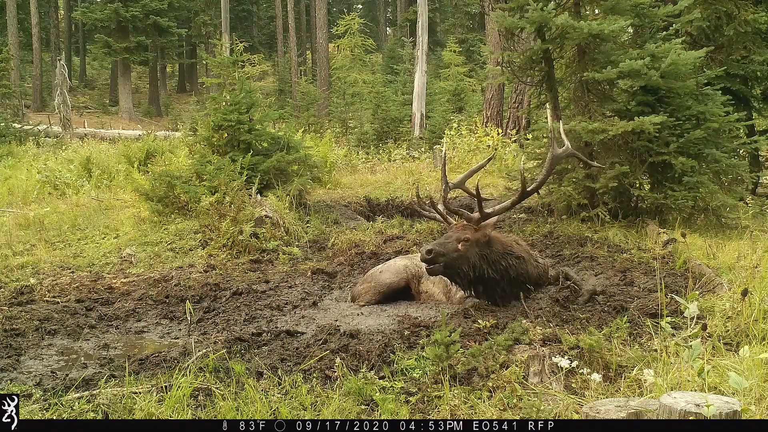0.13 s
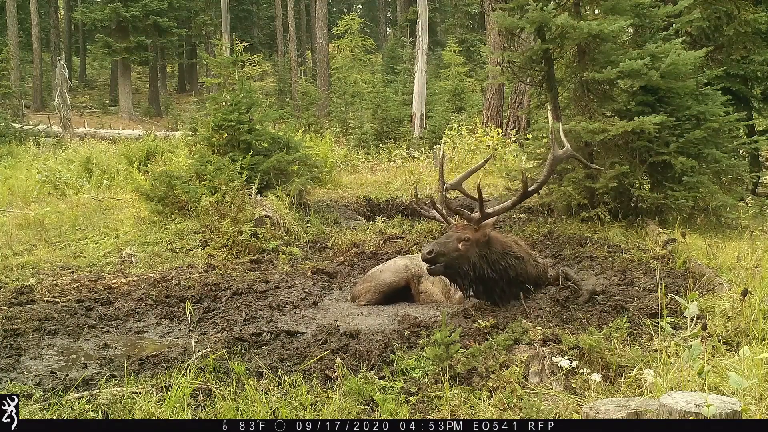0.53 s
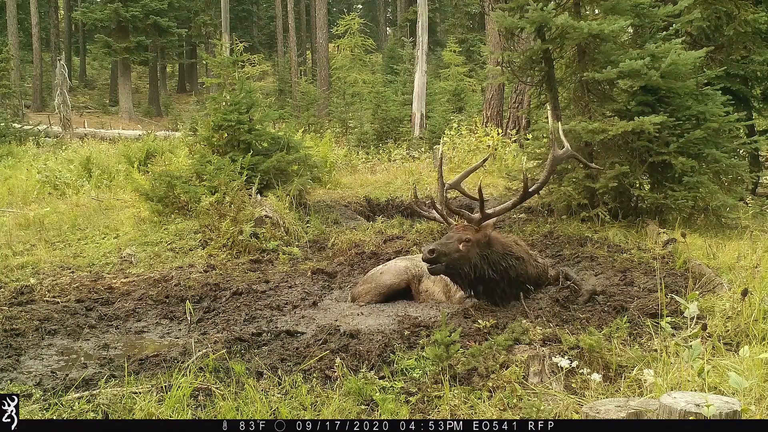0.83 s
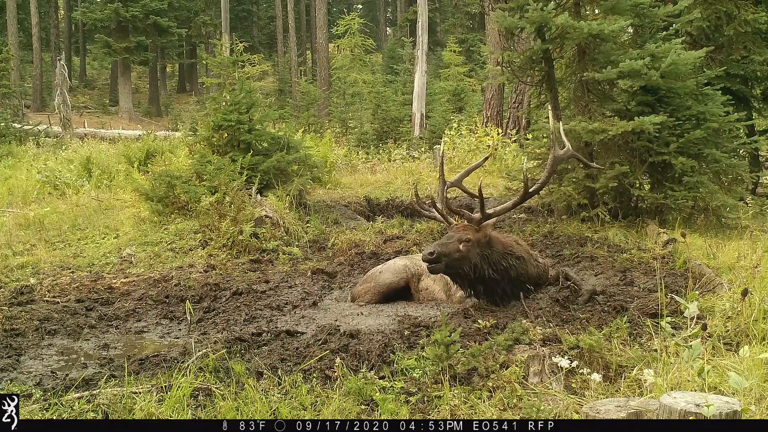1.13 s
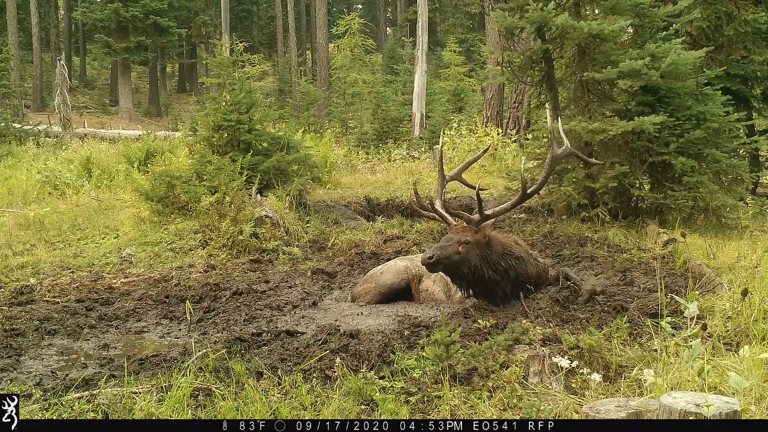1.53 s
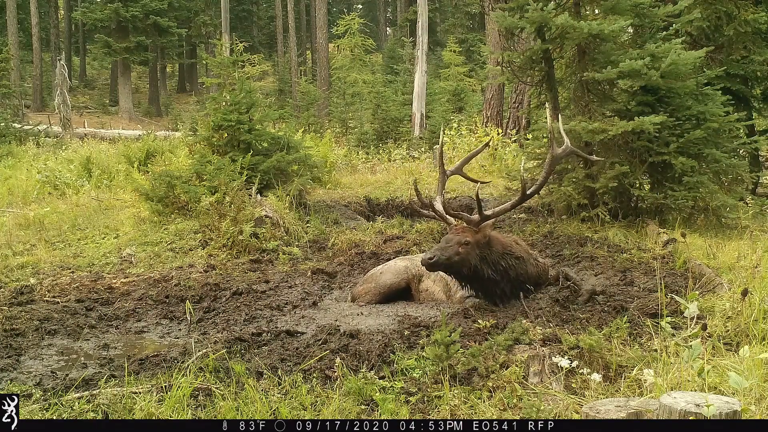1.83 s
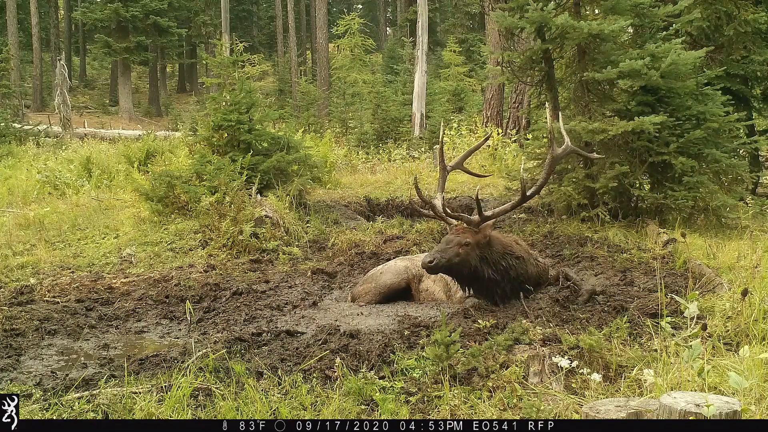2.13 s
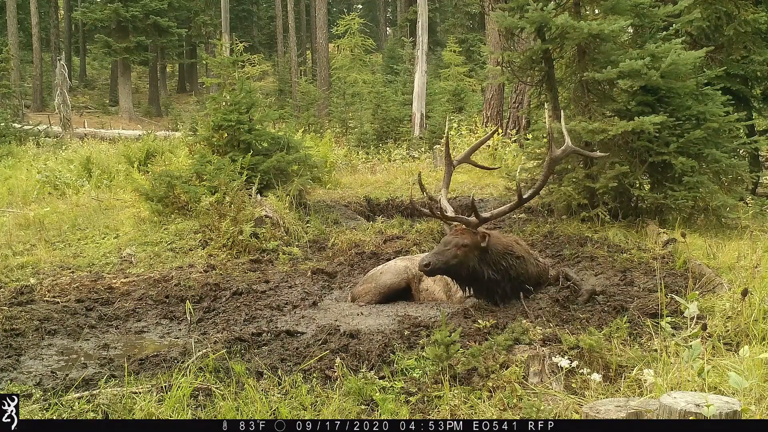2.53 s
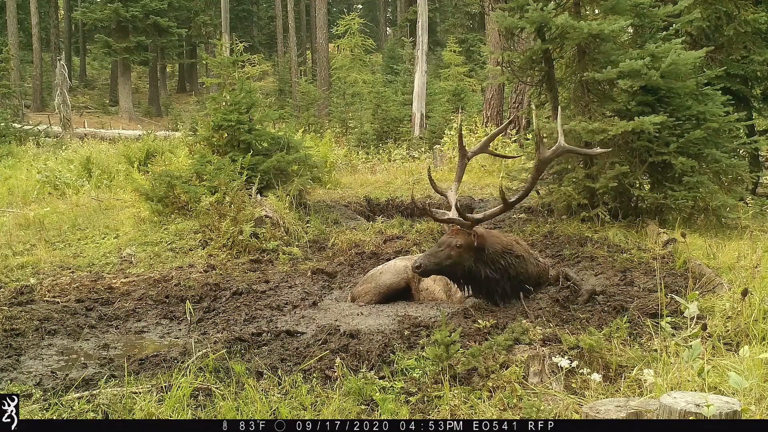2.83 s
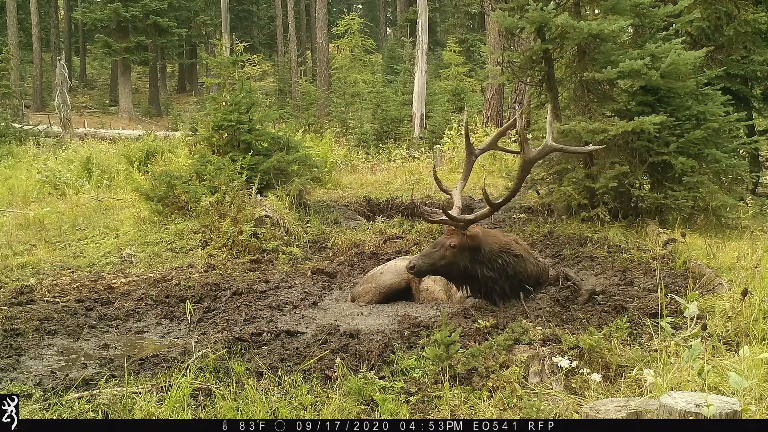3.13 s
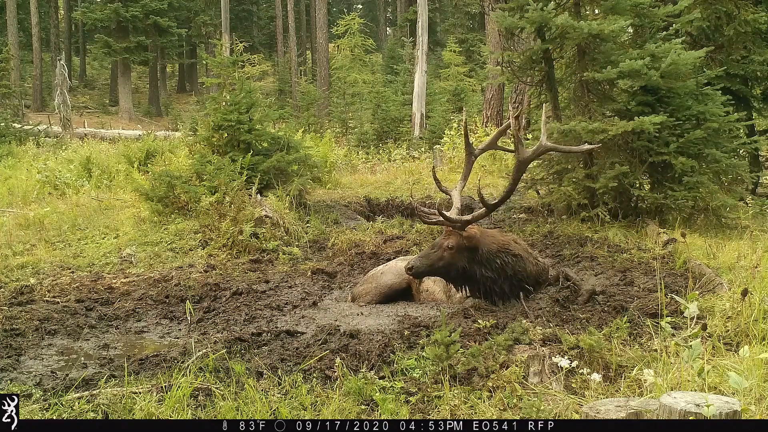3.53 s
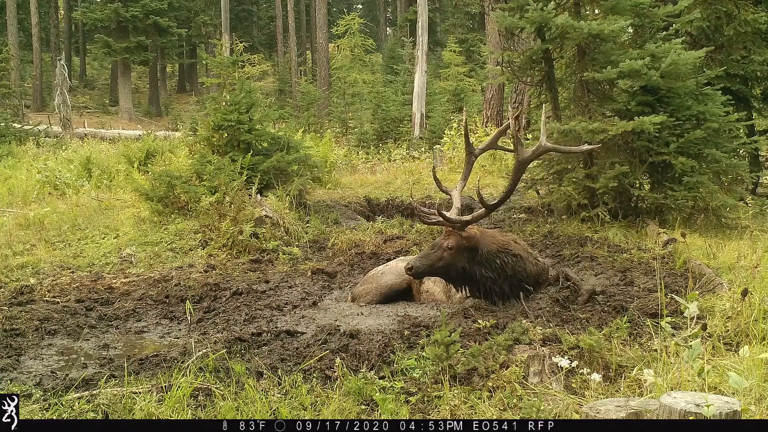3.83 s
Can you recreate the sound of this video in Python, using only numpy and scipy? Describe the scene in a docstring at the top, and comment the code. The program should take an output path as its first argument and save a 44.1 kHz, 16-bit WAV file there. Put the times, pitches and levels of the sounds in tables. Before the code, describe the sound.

A bull elk gives two piercing, overloaded whistled calls ending in hoarse grunts, ringing through forest.

```python
"""A bull elk gives two piercing whistled calls close to a trail camera: a gliding fundamental and octave.
Each drops into a hoarse grunt, made of throbbing throat air and irregular chest pulses.
The loud calls overload the microphone; the elk's pants, shaped noise, come between and after them.
The trees ring on, as a decaying scatter of noise, over forest air, faint pips and dull rumbles.
The camera adds a thin steady whine and hiss."""
import sys
import numpy as np
from scipy import signal
from scipy.fft import rfft, irfft
from scipy.io import wavfile
from scipy.ndimage import uniform_filter1d

SR = 44100
rng = np.random.default_rng(int(sys.argv[2]) if len(sys.argv) > 2 else 0)


def put_to_file(sound):
    """Save the sound as 16-bit audio at rate SR, in the file named by the first command-line argument."""
    columns = np.atleast_2d(sound).T  # one column per channel
    safe = np.clip(columns, -1, 1)
    whole_steps = np.round(safe * 32767)
    wavfile.write(sys.argv[1], SR, whole_steps.astype(np.int16))


N = 176400  # 4 s

# Whistles, one list per call. Each row: time in seconds, pitch in Hz, fundamental in dB, octave in dB,
# all before the overload.
WHISTLE_TRACKS = [
    [(0, 1470, -20.5, -21.5), (.014, 1436, -11, -21), (.032, 1489, -17.5, -12.5), (.05, 1500, -8, -11),
     (.08, 1502, -3.5, -15), (.12, 1504, 1.5, -3.5), (.16, 1509, -2, 3), (.187, 1522, -9, 5.5),
     (.203, 1527, 2.5, 6.5), (.224, 1555, 9, -5), (.233, 1309, 11, -20.5), (.243, 1314, 9, -13),
     (.25, 1046, 1.5, -20), (.26, 1044, -13.5, -32), (.282, 1002, -21, -39.5)],
    [(.640, 1310, -5, -25), (.647, 1303, 0.5, -17), (.655, 1285, 1, -22.5), (.672, 1300, 6.5, -28.5),
     (.70, 1307, 8, -21), (.725, 1300, 6.5, -33), (.738, 1288, 7.5, -29.5), (.744, 1212, -6, -21.5),
     (.75, 1070, 8.5, -15), (.757, 1004, 7, -8), (.766, 1006, 0, -19), (.773, 1010, -18.5, -20.5)],
]
# Whistle partials 3 to 10. Each entry: level in dB relative to the octave, whose amplitude is capped here.
OVERTONE_LEVELS_DB = [-16.5, -15.5, -17, -22.5, -31, -30.5, -35.5, -34.5]
# Breath in each whistle. Each entry: level in dB relative to the fundamental, whose range is limited here.
WHISTLE_BREATH_DB = [-30, -39.5]
# Colour of that breath. Each row: frequency in Hz, relative level in dB.
WHISTLE_BREATH_COLOUR = [(60, -18.5), (250, -7.5), (600, -17.5), (850, -13.5), (1030, -0.5), (1350, -3),
                         (1700, -9.5), (2100, 2.5), (2600, -11.5), (3500, -19.5), (12000, -30)]
# Send of each whistle to the trees. Each entry: gain in dB.
WHISTLE_TREE_SEND_DB = [5, -5.5]
# Forest ring bands. Each row: centre in Hz, level in dB, 60 dB decay time in seconds.
TREE_BANDS = [(125, -25.5, 2.0), (250.2, -25.5, 4.4), (599, -30, 1.6), (1050, -33, 2.0), (1320, -34, 3.6),
              (1560, -27, 1.5), (2900, -41.5, 1.1), (4600, -31.5, .8), (7000, -46.5, .6)]
# Colour of the forest air, used below 9 kHz. Each row: frequency in Hz, relative level in dB.
AIR_COLOUR = [(12, -35.5), (20, -4), (44, -2), (109, -3.5), (216, -6.5), (311, -9), (439, -10),
              (472, -10.5), (938, -15.5), (1320, -19), (1770, -21), (7000, -28.5), (9100, -49.5),
              (15400, -120)]
# Grunts. Each row: peak in seconds, throat level in dB, 20 dB rise in seconds, 20 dB fall in seconds,
# mean pulse rate in Hz, growl level in dB, growl delay in seconds.
GRUNT_EVENTS = [(0.234, -4, 0.057, 0.052, 110.1, -12.5, 0.019),
                (0.75, -11, 0.026, 0.066, 129.4, -14, 0.005)]
# Colour of the hoarse throat air. Each row: frequency in Hz, relative level in dB.
THROAT_COLOUR = [(40, -25), (130, -16.5), (230, -8.5), (420, -18), (660, -16), (850, -16), (1020, 0.5),
                 (1330, -6.5), (1700, -11.5), (2000, -8.5), (2400, -19), (3000, -17.5), (3700, -27.5),
                 (6000, -23), (15000, -43)]
# Colour of the chest growl. Each row: frequency in Hz, relative level in dB.
CHEST_COLOUR = [(30, -13), (75, -6), (120, -2), (160, -6.5), (225, 3), (280, -2.5), (360, -12), (480, -19),
                (680, -12), (1200, -26), (3000, -61.5)]
# Pants. Each row: start in seconds, peak in seconds, end in seconds, mean peak level in dB,
# then colour offsets: chest in dB, mouth resonance in dB, treble in dB.
PANT_EVENTS = [(0.353, 0.542, .572, -25, -1, 0, -2), (0.611, .628, 0.74, -40, -21.5, 18, 6),
               (0.749, 1.025, 1.39, -39.5, 2, -2, -6.5), (1.329, 1.472, 1.54, -36, -3, 6, -7),
               (1.723, 1.818, 1.95, -56.5, 5, 6, 13)]
# Colour of a pant before its offsets. Each row: frequency in Hz, relative level in dB.
PANT_BASE_COLOUR = [(60, -20), (130, -8.5), (180, -14.5), (270, -1.5), (430, -20.5), (890, -17.5),
                    (1020, 1.5), (1170, -8), (1320, -7.5), (1500, -10.5), (1660, -14.5), (1790, -13.5),
                    (1950, -10.5), (2170, -17), (2380, -17.5), (2600, -11.5), (2850, -16), (3050, -12.5),
                    (3500, -37.5), (4600, -22.5), (6500, -26.5), (15000, -47.5)]
# Faint pips. Each row: centre in seconds, pitch in Hz, peak level in dB, half length in seconds.
PIPS = [(0.864, 5200, -42, 0.002), (1.077, 3050, -45.5, 0.0033), (2.033, 3050, -49, .003),
        (3.13, 2700, -50, .004), (3.189, 3080, -47, .005)]
# Dull rumbles. Each row: centre in seconds, peak level in dB, half length in seconds.
RUMBLE_EVENTS = [(2.592, -39.5, 0.023), (2.703, -42, 0.059)]
# Colour of the rumbles. Each row: frequency in Hz, relative level in dB.
RUMBLE_NOISE_COLOUR = [(40, -36), (90, 3.5), (125, 0.5), (200, -11), (500, -27), (2000, -70)]

EDGE_S, WAVER_FRACTION = .004, .0018
BREAK_S, BREAK_JITTER_FRACTION, BREAK_SHIMMER_DB = .044, .025, 3.5
EARLY_DB, EARLY_T60_S, TREES_ONSET_S = -20.5, .18, .0094
AIR_DB, HISS_DB = -45.5, -56
WHINE_HZ, WHINE_RMS_DB = 7867.2, -44
GRUNT_JITTER_FRACTION, GRUNT_THROB_DEPTH = .16, .19
CHEST_BELOW_HZ, MOUTH_HZ, MOUTH_WIDTH_HZ, TREBLE_ABOVE_HZ = 600, 1980, 170, 2250
CEILING, KNEE_EXPONENT = .9, 9
DC_CUT_HZ, TOP_HZ = 9, 15400


def undb(db):
    """Convert dB to an amplitude factor."""
    return 10 ** (np.asarray(db) / 20)


def unit(x):
    """Scale to rms 1."""
    return x / np.sqrt(np.mean(x ** 2))


def log_bins():
    """Log frequency of each spectrum bin, floored at 1 Hz."""
    return np.log(np.maximum(np.arange(N // 2 + 1) * SR / N, 1))


def colour(x, points):
    """Filter by a (Hz, dB) curve, linear in dB over log frequency; rms 1."""
    hz, db = np.array(points, float).T
    gain = undb(np.interp(log_bins(), np.log(hz), db))
    return unit(irfft(rfft(x) * gain, N))


def noise():
    """White Gaussian noise."""
    return rng.standard_normal(N)


def walk(rate_hz):
    """Smooth random drift with rms 1: noise averaged twice over 1 / rate."""
    k = max(int(SR / rate_hz), 2)
    return unit(uniform_filter1d(uniform_filter1d(noise(), k), k))


def bump(t, centre_s, half_s):
    """Gaussian envelope, down to 1/e at the half length."""
    return np.exp(-((t - centre_s) / half_s) ** 2)


def whistle(t, rows, breath_db):
    """A nearly pure tone whose octave swells and fades; it falls in pitch and ends rough."""
    s, hz, first_db, octave_db = np.array(rows).T
    fade_in = np.clip((t - s[0]) / EDGE_S, 0, 1)
    fade_out = np.clip((s[-1] - t) / EDGE_S + 1, 0, 1)
    rough = np.clip(2 * (1 - (s[-1] - t) / BREAK_S), 0, 1)
    wobble = WAVER_FRACTION * walk(150) + BREAK_JITTER_FRACTION * rough * walk(440)
    phase = 2 * np.pi * np.cumsum(np.interp(t, s, hz) * (1 + wobble)) / SR
    first = undb(np.interp(t, s, first_db) + BREAK_SHIMMER_DB * rough * walk(350))
    octave = undb(np.interp(t, s, octave_db))
    overtones = 0
    for k, db in enumerate(OVERTONE_LEVELS_DB, 3):
        overtones = overtones + undb(db + 2 * walk(40)) * np.sin(k * phase)
    tone = first * np.cos(phase) - octave * np.cos(2 * phase)
    tone = tone + np.minimum(octave, .3) * overtones
    breath = undb(breath_db) * np.clip(first, .7, 1.2) * colour(noise(), WHISTLE_BREATH_COLOUR)
    return fade_in * fade_out * (tone + breath)


def tree_ring(x, t):
    """Short broadband scatter from ground and near trunks, then a tail decaying band by band."""
    hz, db, t60_s = np.array(TREE_BANDS).T
    scatter = rfft(noise())
    onset = np.clip(t / TREES_ONSET_S, 0, 1)

    def decay(seconds):
        """Exponential decay with unit energy."""
        e = onset * np.exp(-np.log(1000) * t / seconds)
        return e / np.sqrt(np.sum(e ** 2))

    response = undb(EARLY_DB) * noise() * decay(EARLY_T60_S)
    # each row of the identity makes one triangular band over log frequency
    for share, band_db, seconds in zip(np.eye(len(hz)), db, t60_s):
        band = irfft(scatter * np.interp(log_bins(), np.log(hz), share), N)
        response = response + undb(band_db) * decay(seconds) * band
    return signal.fftconvolve(x, response)[:N]


def forest_air(t):
    """Quiet coloured noise with a slight slow drift in level."""
    below = [tuple(row) for row in AIR_COLOUR if row[0] < 9000]
    curve = below + [(9000, -48.6), (9000.1, -68)]  # steps down at 9 kHz, then flat
    return undb(AIR_DB + .13 * walk(3.4)) * colour(noise(), curve)


def camera(t):
    """The electronics add a steady sine whine and high-pitched hiss."""
    whine = undb(WHINE_RMS_DB) * np.sqrt(2) * np.sin(2 * np.pi * WHINE_HZ * t)
    hiss = colour(noise(), [(5000, -29.5), (7200, -3), (11000, -4), (15000, -6)])
    return whine + undb(HISS_DB) * hiss


def grunt(t, peak_s, db, rise_s, fall_s, pulse_hz, growl_db, delay_s):
    """Throbbing air rings the throat; irregular pulses growl in the chest just after."""
    cycles = np.cumsum(pulse_hz * (1 + GRUNT_JITTER_FRACTION * walk(120))) / SR
    pulses = np.diff(np.floor(cycles), prepend=0) * undb(3 * walk(200))
    air = noise() * (1 + GRUNT_THROB_DEPTH * np.cos(2 * np.pi * cycles))

    def swell(at_s):
        """Gaussian rise, exponential fall."""
        before, after = np.maximum(at_s - t, 0), np.maximum(t - at_s, 0)
        return undb(-20 * ((before / rise_s) ** 2 + after / fall_s))

    throat = colour(air, THROAT_COLOUR)
    growl = colour(unit(pulses - pulses.mean()) + .27 * air, CHEST_COLOUR)
    return undb(db) * swell(peak_s) * throat + undb(growl_db) * swell(peak_s + delay_s) * growl


def pant(t, start_s, peak_s, end_s, db, chest_db, mouth_db, treble_db):
    """Fluttering air through the elk's open mouth swells and stops."""
    shape = np.interp(t, [start_s, peak_s, end_s], [0, 1, 0])
    curve = []
    for hz, base_db in PANT_BASE_COLOUR:
        chest = chest_db * (hz < CHEST_BELOW_HZ)
        mouth = mouth_db * np.exp(-((hz - MOUTH_HZ) / MOUTH_WIDTH_HZ) ** 2)
        treble = treble_db * (hz > TREBLE_ABOVE_HZ)
        curve.append((hz, base_db + chest + mouth + treble))
    return undb(db + walk(97)) * shape * colour(noise(), curve)


def pips(t):
    """Faint pips: short sine bursts under Gaussian envelopes."""
    return sum(undb(db) * bump(t, s, half_s) * np.sin(2 * np.pi * hz * t)
               for s, hz, db, half_s in PIPS)


def rumbles(t):
    """Dull distant rumbles: brief swells of low noise."""
    swells = sum(undb(db) * bump(t, s, half_s) for s, db, half_s in RUMBLE_EVENTS)
    return swells * colour(noise(), RUMBLE_NOISE_COLOUR)


def scene():
    """The elk close by, its ring among the trees, forest sounds and camera noise."""
    t = np.arange(N) / SR
    calls = [whistle(t, rows, db) for rows, db in zip(WHISTLE_TRACKS, WHISTLE_BREATH_DB)]
    throat = sum(grunt(t, *row) for row in GRUNT_EVENTS) + sum(pant(t, *row) for row in PANT_EVENTS)
    sent_calls = sum(undb(db) * call for db, call in zip(WHISTLE_TREE_SEND_DB, calls))
    elk = sum(calls) + throat
    ring = tree_ring(throat + sent_calls, t)
    forest = forest_air(t) + pips(t) + rumbles(t)
    return (elk + ring + forest + camera(t))[None]


def record(dry):
    """The microphone stage flattens loud calls; the recorder blocks the offset and cuts the top."""
    fine = signal.resample_poly(dry, 4, 1, axis=-1)  # oversample against aliasing
    flat = fine / (1 + np.abs(fine / CEILING) ** KNEE_EXPONENT) ** (1 / KNEE_EXPONENT)
    x = signal.resample_poly(flat, 1, 4, axis=-1)
    x = signal.sosfilt(signal.butter(1, DC_CUT_HZ, "high", fs=SR, output="sos"), x)
    return signal.sosfiltfilt(signal.ellip(8, .05, 50, TOP_HZ, fs=SR, output="sos"), x)


dry = scene()
out = record(dry)
put_to_file(out)
```